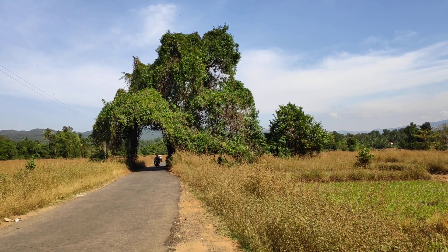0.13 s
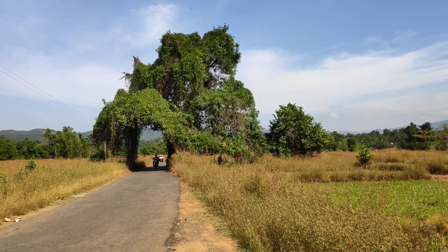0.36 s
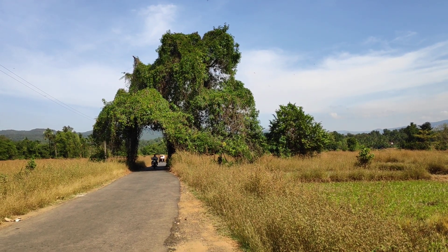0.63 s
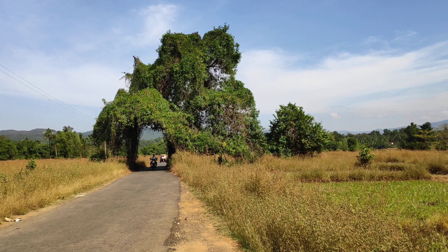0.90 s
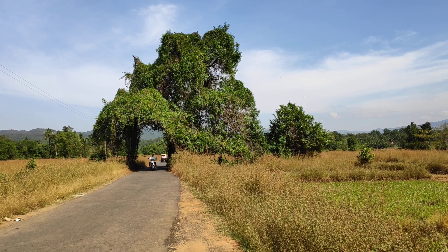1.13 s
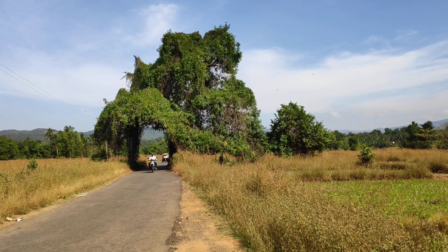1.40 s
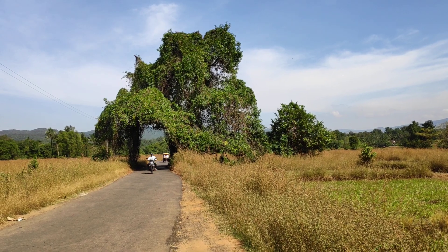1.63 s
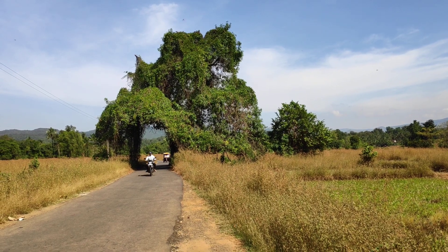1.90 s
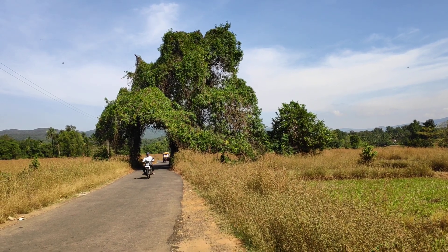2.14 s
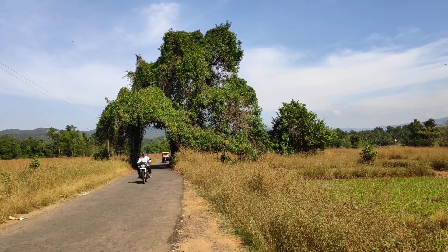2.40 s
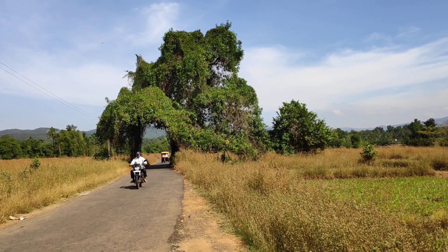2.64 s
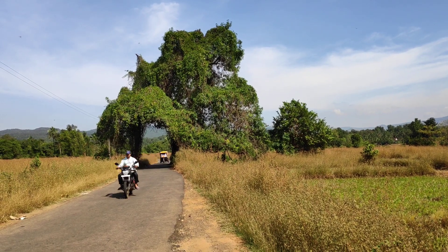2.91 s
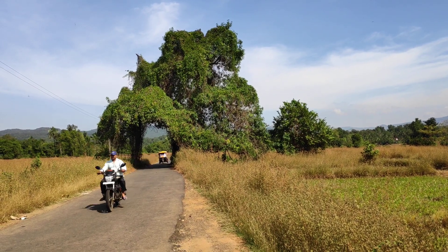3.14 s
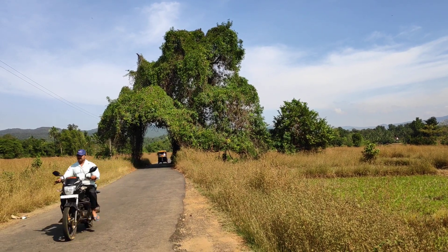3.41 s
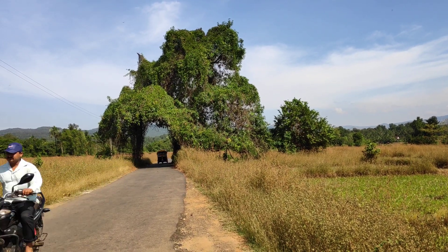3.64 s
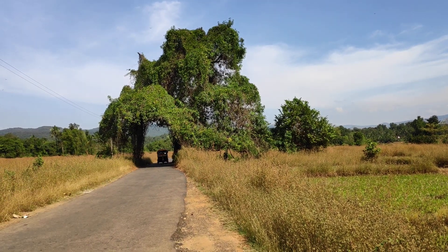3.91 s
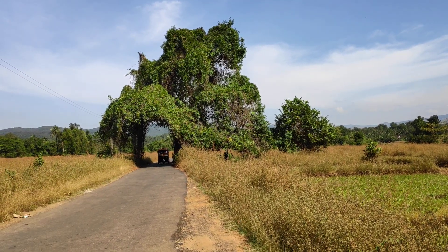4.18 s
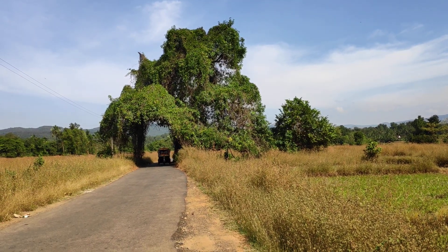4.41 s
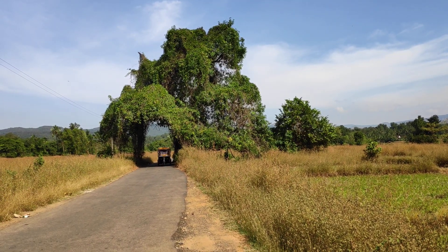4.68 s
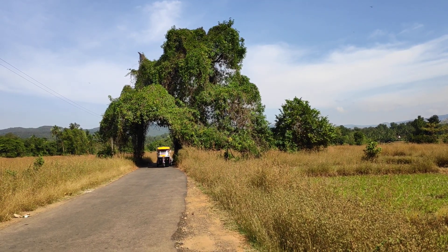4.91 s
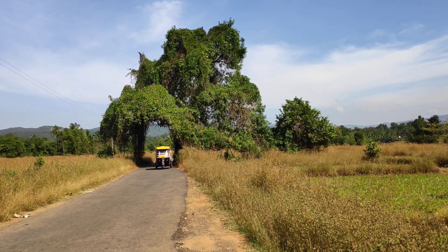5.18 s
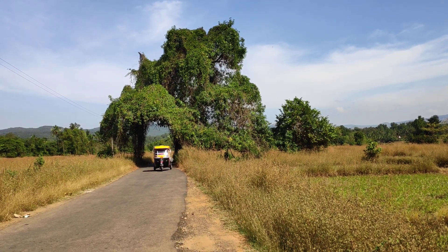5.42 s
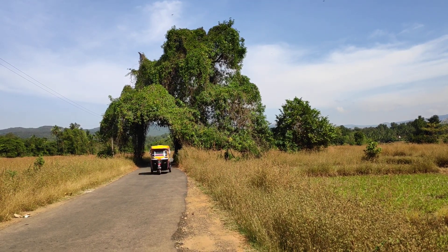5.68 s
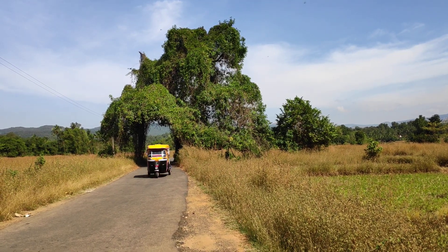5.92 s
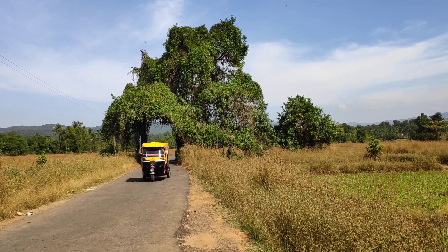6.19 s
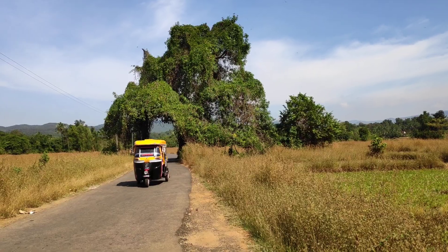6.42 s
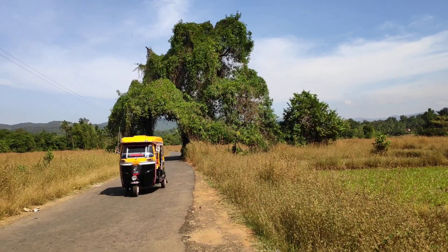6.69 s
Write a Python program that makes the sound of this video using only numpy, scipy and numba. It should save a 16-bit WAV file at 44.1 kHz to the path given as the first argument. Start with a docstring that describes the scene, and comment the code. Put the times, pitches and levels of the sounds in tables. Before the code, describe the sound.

Open country road, heard in stereo by a hand-held phone standing at the verge. From 0 s a single-cylinder motorcycle is distant and muffled by a tree, a quick low exhaust thump over faint rumble and field hiss. From about 1.5 s it grows steadily, thumps fusing into a rough drone with tyre roar, engine clatter and chain hiss. It peaks at about 4 s in a close, bright rush; the colour turns, pitch drops, and a sharp grit tick cracks at 4.3 s, another at 4.7 s. The motorcycle then recedes, thumping more dully. Around 5.6 s dry verge grass rustles briefly. Meanwhile a three-wheeler ahead emerges from about 4.5 s, its coarse putter and tyre roar growing, firing rate sagging slightly from 5.5 s. From 6.4 s dull body knocks cluster with fine grit ticks. Small low wind puffs come and go; it ends at 6.8 s with the three-wheeler still approaching.

```python
"""Exhaust thumps grow as a single-cylinder motorcycle comes down a country road, passes close by and recedes.
A three-wheeler follows it: both exhausts are chains of pulses, one a firing, with shaped noise for tyre roar and engine.
Dull knocks, dry grit ticks and a rustle of the verge join in, over low rumble, wind puffs and hiss from the fields.
Two microphone ports of a hand-held phone hear it all, and the colour turns as the motorcycle goes by."""
import sys
import numpy as np
from scipy import signal
from scipy.fft import rfft, irfft, next_fast_len
from scipy.io import wavfile
from scipy.ndimage import uniform_filter1d, map_coordinates
from numba import njit

SR = 44100
rng = np.random.default_rng(int(sys.argv[2]) if len(sys.argv) > 2 else 0)


def put_to_file(sound):
    """Save the sound as 16-bit audio at rate SR, in the file named by the first command-line argument."""
    columns = np.atleast_2d(sound).T  # one column per channel
    safe = np.clip(columns, -1, 1)
    whole_steps = np.round(safe * 32767)
    wavfile.write(sys.argv[1], SR, whole_steps.astype(np.int16))


def to_linear_factor(level_db):
    """Convert decibel levels (scalar or array-like) to linear amplitude factors."""
    exponent = np.asarray(level_db, float) / 20
    return 10 ** exponent


N = 300321
T = np.arange(N) / SR
SIZE = next_fast_len(N)
HZ = np.arange(SIZE // 2 + 1) * SR / SIZE + 1e-3  # just above 0, so that logarithms work

# Colour of sound from ahead at the two ports. Each row: frequency in Hz, left level in dB, right level in dB.
AHEAD_COLOUR = [(283, 12, 9), (468, -3, 2), (717, 11, 9), (860, 0.5, 3), (1300, 7.5, 4), (1970, -2, -3.5),
                (2780, -5, -3), (3500, -10.5, -8.5), (5130, -10, -10.5), (6500, -13.5, -12.5),
                (8500, -14, -15), (10000, -12, -28), (10700, -12.5, -20), (12000, -22, -42),
                (13800, -14.5, -51), (15700, -37, -46)]
# The three-wheeler as heard. Each row: time in seconds, firing rate in Hz, roar level in dB.
THREE_WHEELER = [(0, 40.3, -72), (4.4, 40.54, -53), (5.0, 40.6, -52.5), (5.5, 39.87, -46.5),
                 (5.8, 39.65, -47), (6.1, 39.06, -45), (6.4, 38.33, -44.5), (6.6, 37.72, -42.5),
                 (6.81, 37.1, -42)]

SPEED_M_S, PASSES_S, ASIDE_M = 13.6, 4.05, 2.66  # the motorcycle's straight path and how near it comes
ECHO_AHEAD = .6  # share of sound from ahead that returns off the holder's body, in the bass


def curves(table):
    """Columns of a time table, drawn as lines with one value a sample."""
    s, *columns = np.transpose(table)
    return [np.interp(T, s, c) for c in columns]


def unit(x):
    """Scale to rms 1."""
    return x / np.sqrt(np.mean(x ** 2))


def walk(rate):
    """Random levels held for 1 / rate seconds, then smoothed twice; spread near 1."""
    k = int(SR / rate)
    held = np.repeat(rng.standard_normal(N // k + 1), k)
    return 1.36 * uniform_filter1d(uniform_filter1d(held, k), k)[:N]


def across(table, column=1):
    """A spectrum table read at every FFT bin, evenly along a logarithmic frequency scale."""
    table = np.array(table, float)
    return np.interp(np.log(HZ), np.log(table[:, 0]), table[:, column])


def high_pass(hz, slope=6):
    """Smooth gain that lets the sound above hz through; slope times 6 dB an octave below."""
    return 1 / np.sqrt(1 + (hz / HZ) ** (2 * slope))


@njit
def band_pass(x, hz, width):
    """State-variable band-pass with a moving centre, gain 1."""
    y, band, low = np.empty(len(x)), 0., 0.
    for i in range(len(x)):
        g, k = np.tan(np.pi * hz[i] / SR), width / hz[i]
        v = (band + g * (x[i] - low)) / (1 + g * (g + k))
        band, low, y[i] = 2 * v - band, low + 2 * g * v, k * v
    return y


def lagged(left, right, lag_ms):
    """Sound reaches the left port a little later."""
    late = map_coordinates(left, [np.arange(N) - lag_ms * SR / 1000], order=3, mode="nearest")
    return np.array([late, right])


def port_spectra():
    """Noise spectra for both ports, most alike in the bass and less so in the treble."""
    # Each row: frequency in Hz, share of the power common to both ports from 0 to 1.
    likeness = [(300, .995), (1000, .97), (1700, .93), (2500, .75), (4000, .5), (7000, .62), (9000, .35),
                (15000, .25)]
    like = np.clip(across(likeness), 0, 1)
    common, left, right = rfft(rng.standard_normal((3, SIZE)))
    return [np.sqrt(like) * common + np.sqrt(1 - like) * own for own in (left, right)]


def coloured(spectra, colour, band, echo=0., echo_ms=(1.92, 2.04)):
    """Both ports through their colour, plus a delayed and duller return off the holder's body."""
    ports = []
    for i, spectrum in enumerate(spectra):
        returned = echo / (1 + (HZ / 4000) ** 4)  # the return fades above 4000 Hz
        delayed = np.exp(-2j * np.pi * HZ * echo_ms[i] / 1000)
        gain = to_linear_factor(across(colour, column=1 + i)) * (1 + returned * delayed)
        ports.append(irfft(spectrum * band * gain, SIZE)[:N])
    return unit(np.array(ports))


def thumps(cycles, order, db, scatter_db, shimmer_db, lift_db):
    """One pulse a firing, built from multiples of the firing rate; each firing has its own size."""
    # the phases follow from the levels, so that each pulse is struck and then rings
    log = np.zeros(33)
    log[:len(order) + 1] = np.log(to_linear_factor(np.r_[db[0], db]))
    log[len(order) + 1:] = np.log(to_linear_factor(db[-1] - 2.0))
    c = irfft(log)
    phase = rfft(np.r_[c[0], 2 * c[1:32], c[32], np.zeros(31)]).imag
    phase = phase + np.pi * 2 / 5  # the same turn for all multiples balances push and pull
    size = to_linear_factor(scatter_db * rng.standard_normal(N // 500))[(cycles + .1).astype(int)]
    wave = 0
    for k, d in zip(np.round(order), db):
        level = to_linear_factor(d + lift_db(k) + shimmer_db * walk(9))
        wave = wave + level * np.cos(2 * np.pi * k * cycles + phase[int(k)])
    return np.sqrt(2) * uniform_filter1d(size, size=60) * wave


def path(late_s=0., aside_m=ASIDE_M):
    """Distance (m) of the motorcycle and its angle from straight ahead (degrees)."""
    along = SPEED_M_S * (T - PASSES_S - late_s)
    return np.hypot(along, aside_m), np.degrees(np.arctan2(aside_m, -along))


def heard_db(db, loss_db, beam_db, aim, half_width, rear_db):
    """Level of one part of the motorcycle: distance, a change within a beam, front against back."""
    tree_m, tree_db_per_m = 45, 0.42  # beyond this distance the roadside tree muffles the motorcycle
    rear_deg, rear_width_deg = 165.1, 2.2  # from this far behind, rider and bodywork screen the engine
    r, angle = path()
    spread = -loss_db * np.log10(r)
    beam = beam_db * np.exp(-((angle - aim) / half_width) ** 4)
    tree = -tree_db_per_m * np.clip(r - tree_m, 0, None)
    rear = rear_db * (1 + np.tanh((angle - rear_deg) / rear_width_deg)) / 2
    return db + spread + beam + tree + rear


def exhaust(bearing):
    """Motorcycle exhaust thumps with Doppler shift and spreading, and the count of firings so far."""
    # Each row: time in seconds, firing rate at the source in Hz, level in dB at 1 m before the levels
    # of the multiples, lift of the four lowest multiples in dB.
    engine = [(0, 38.56, -26, 7), (.45, 38.45, -26, 2), (.7, 37.53, -23.5, 0), (1.5, 37.38, -18.5, -1.5),
              (1.9, 37.4, -18, -1.5), (2.7, 37.78, -18, -4), (3.0, 37.7, -17, -1), (3.45, 37.87, -21, 2.5),
              (3.6, 37.07, -21, 2.5), (3.8, 37.06, -22.5, 2.5), (3.98, 37.4, -24.5, 2.5),
              (4.1, 37.07, -28.5, 3), (4.25, 37.34, -23, 0), (4.4, 37.6, -22.5, 1.5),
              (4.55, 37.54, -21, 0.5), (5.1, 37.54, -19, 2), (5.8, 37.7, -19.5, 0.5),
              (6.3, 37.77, -22, -10), (6.81, 37.42, -24.5, 1)]
    # Each row: multiple of the firing rate, level in dB from the front, level in dB from behind.
    multiples = [(1, -9.5, -9), (2, -4, -8), (3, -11, -13), (4, -20.5, -8.5), (5, 0.5, 1), (6, -6.5, -2),
                 (7, -15.5, -10), (8, -20, -15.5), (9, -14, -14), (10, -18, -15), (11, -31, -22),
                 (12, -30, -25), (13, -18.5, -25), (14, -25, -22)]
    hz, db, low_db = curves(engine)
    r, angle = path(.03, 1.6)  # the tail pipe passes later (s) and nearer (m)
    hz = hz / (1 - SPEED_M_S / 343 * np.cos(np.radians(angle)))  # Doppler shift
    db = db - 20 * np.log10(r)
    wheel_hz, wheel_wobble = 5.6, .006  # the load, and so the firing rate, sways once a wheel turn
    sway = wheel_wobble * (1 + .4 * walk(2)) * np.sin(2 * np.pi * wheel_hz * T)
    cycles = np.cumsum(hz * (1 + .003 * walk(12) + sway)) / SR
    order, front_db, rear_db = np.transpose(multiples)
    lift = lambda k: low_db * (k < 4.5)
    front = thumps(cycles, order, front_db, 1.3, 1.5, lift)
    back = thumps(cycles, order, rear_db, 1.3, 1.5, lift)
    rear = np.clip(bearing / 2, 0, 1)
    return to_linear_factor(db) * ((1 - rear) * front + rear * back), cycles


def tyre_and_engine_noise(bearing, cycles):
    """Four bands of noise that swell once a firing and blend the colours ahead, abreast and behind."""
    # Rows: tyre roar, engine clatter, chain and valve hiss, finest sizzle. Each row: level in dB at 1 m,
    # loss in dB for tenfold distance, lift within the side beam in dB, its aim and its half width in degrees
    # from straight ahead, change from behind in dB.
    parts = [(-27, 16.85, 6.3, 82, 44, -0.5), (-27.5, 20.8, 8.4, 83, 55, -5.5),
             (-17.5, 30.4, 1.9, 86, 53.3, -4.5), (-28, 27.6, 8.6, 110, 28, -4)]
    # Colours by direction. Each row: frequency in Hz, left level in dB, right level in dB.
    abreast_colour = [(325, 1, 1), (523, -5.5, -5.5), (716, 4, 5.5), (1030, 6.5, 4), (1510, 0, 4),
                      (1990, -3.5, -10.5), (2720, 1.5, -4.5), (3800, -6, -10), (5500, -1.5, -7),
                      (6600, -6, -1), (7700, -3.5, -2.5), (8900, -3, -7), (10600, -4, -8), (12000, 0.5, -9),
                      (14200, 3, -12), (16400, -2, -38)]
    behind_colour = [(314, -9.5, 5.5), (500, -3, -19), (725, -2.5, -0.5), (1090, -4.5, -7),
                     (1630, -6.5, -13.5), (2470, 4, -5), (2830, 3, -6), (4000, -11, -12), (5200, -8, -2.5),
                     (6460, -14, -4.5), (8150, -23, -3), (9150, -2.5, -5), (10500, -16, -14.5),
                     (12000, -18, -14), (13800, -8, -21), (15500, -14.5, -21)]
    low, high, top = high_pass(1860), high_pass(4590), high_pass(10280)
    roar = high_pass(264, slope=2.8) * np.sqrt(1 - low ** 2)
    bands = roar, low * np.sqrt(1 - high ** 2), high * np.sqrt(1 - top ** 2), top
    levels_db = [heard_db(*row) for row in parts]
    depths, flickers_db = (.06, .1, .12, .12), (.8, 1., 1.2, 1.4)
    beat = np.cos(2 * np.pi * cycles - 1.0)
    gusty = 0.93 * walk(9)  # air eddies sway all bands together
    out = np.zeros((2, N))
    directions = (AHEAD_COLOUR, ECHO_AHEAD), (abreast_colour, .1), (behind_colour, .15)
    for k, (colour, echo) in enumerate(directions):
        share = np.sqrt(np.clip(1 - abs(bearing - k), 0, 1))
        spectra = port_spectra()
        for band, level_db, depth, flicker_db in zip(bands, levels_db, depths, flickers_db):
            level = to_linear_factor(level_db + flicker_db * (walk(21.88) + gusty)) * (1 + depth * beat)
            out = out + share * level * coloured(spectra, colour, band, echo=echo)
    return out


def phone_shadow(out, bearing):
    """The phone's body takes moving dips out of the left port; its edge hollows the low mids of both."""
    # Each row: bearing (0 ahead, 1 abreast, 2 behind), low dip in Hz, high dip in Hz, depth from 0 to 1
    # before a limit of .68.
    dips = [(.1, 4400, 9000, .5), (.3, 4500, 9600, 0.97), (.6, 6500, 11490, .68), (1, 6600, 11000, 0.34),
            (1.4, 5840, 12000, .68), (1.95, 6600, 11580, 0.2)]
    at, *columns = np.transpose(dips)
    low_hz, high_hz, depth = (np.interp(bearing, at, c) for c in columns)
    for dip_hz, width_hz in ((low_hz, 1900.), (high_hz, 2000.)):
        out[0] -= np.clip(depth, 0, .68) * band_pass(out[0], dip_hz, width_hz)
    # the hollow starts before the motorcycle is abreast and is full soon after
    for port, edge_hz in enumerate((1400., 1720.)):
        hollow = .55 * np.clip(bearing - .4, 0, 1)
        out[port] -= hollow * band_pass(out[port], np.full(N, edge_hz), 500.)
    return out


def motorcycle():
    """Exhaust thumps over roar, clatter and hiss; their colour and port lag turn with the bearing."""
    side = ASIDE_M / path()[0]  # 1 when abreast, near 0 when far
    turn_ahead, turn_behind = 0.65, 1.1  # how fast the colour turns away from the side colour
    bearing = np.where(T < PASSES_S, side ** turn_ahead, 2 - side ** turn_behind)  # 0 ahead 1 abreast 2 behind
    lag_far_ms, lag_abreast_ms = 0.048, 0.374
    lag_ms = lag_far_ms + (lag_abreast_ms - lag_far_ms) * side ** 0.88
    pipe, cycles = exhaust(bearing)
    out = pipe + tyre_and_engine_noise(bearing, cycles)
    return lagged(*phone_shadow(out, bearing), lag_ms)


def three_wheeler():
    """A second chain of exhaust thumps with a hum of upper multiples, and its roar from ahead."""
    # Each row: multiple of the firing rate, level in dB.
    multiples = [(1, -12), (2, -2.5), (3, -6.5), (4, -11), (5, -16), (6, -3.5), (7, -15), (8, -12.5),
                 (9, -19), (10, -10), (11, -20), (12, -8.5)]
    # Each row: frequency in Hz, left level in dB, right level in dB.
    colour = [(302, 0, 2), (442, -12, -7.5), (700, 4, 5), (910, -2, 0), (1310, 4, -1), (2120, -9, -5),
              (3020, -7, -8.5), (3900, -17, -10), (5200, -12, -13.5), (6500, -22, -17), (8050, -16.5, -21),
              (9200, -25, -43), (10500, -26, -53), (12000, -24, -49), (13800, -24, -49), (15500, -28, -37)]
    hz, roar_db = curves(THREE_WHEELER)
    pipe_db = roar_db - 4.5
    # the upper hum is lifted at speed and fades below a firing rate of 39.46 Hz, by 10 dB a Hz
    hum_db = 4.5 + 10 * np.clip(hz - 39.46, None, 0)
    cycles = np.cumsum(hz * (1 + .003 * walk(20))) / SR
    pipe = thumps(cycles, *np.transpose(multiples), 1.2, 2.3, lambda k: hum_db * (k > 10.5))
    roar = coloured(port_spectra(), colour, high_pass(280, slope=5.9), echo=ECHO_AHEAD)
    roar = roar * to_linear_factor(roar_db + 0.94 * walk(10)) * (1 + .1 * np.cos(2 * np.pi * cycles))
    return lagged(*(to_linear_factor(pipe_db) * pipe + roar), 0.1)


def jolts():
    """The three-wheeler knocks over a rough patch: short pushes that ring the body briefly."""
    # Each row: start in seconds, rough peak level in dB, ring in Hz.
    knocks = [(6.402, -34, 89.4), (6.534, -29.5, 100), (6.566, -32, 130), (6.597, -29.5, 140.4),
              (6.629, -31, 150), (6.656, -30, 79.4), (6.715, -30.5, 138.8), (6.769, -31, 148),
              (6.796, -32, 150)]
    out, t = np.zeros(N + 4000), np.arange(4000) / SR
    swell = t / 0.0047 * np.exp(1 - t / 0.0044)
    for s, db, hz in knocks:
        i = int(s * SR)
        out[i:i + 4000] += to_linear_factor(db) * np.sin(2 * np.pi * hz * t + 0.83) * swell
    return out[:N]


def rustle():
    """Verge grass and dust stirred by the motorcycle's wake: noise that swells once and dies."""
    # Each row: frequency in Hz, left level in dB, right level in dB.
    colour = [(5002, -22, -13), (7500, 0, 1), (9000, 4, -2), (10500, -4, -8), (12000, -9, -16),
              (13700, 3, -22), (15550, -13, -15.5)]
    peak_s, rise_s, fall_s = 5.614, 0.24, 0.23  # the peak, and the times to 9 dB down
    swell = np.exp(-((T - peak_s) / np.where(T < peak_s, rise_s, fall_s)) ** 2)
    return swell * to_linear_factor(-54.5 + 2.0 * walk(24.93)) * coloured(port_spectra(), colour, 1.)


def ticks():
    """Grit thrown by tyres: short bright cracks of noise that die in a few milliseconds."""
    # Each row: start in seconds, peak level in dB midway between the ports, left minus right in dB,
    # centre in Hz.
    grit = [(.142, -47, 5, 8500), (2.477, -44, 0, 11000), (3.5, -43, 2, 12000), (4.33, -28, 4, 12500),
            (4.689, -34, -4, 9000), (5.434, -48, 6, 13500), (5.601, -39, 6, 11500), (5.622, -36, 8, 10800),
            (6.381, -40, 3, 11500), (6.501, -43, 2, 12000), (6.52, -38.5, 7, 11500), (6.524, -44, 1, 12000)]
    out, n = np.zeros((2, N)), np.arange(800)
    fade = np.exp(-n / (.0007 * SR)) + .25 * np.exp(-n / (.004 * SR))
    for (s, db, pan_db, hz), noise in zip(grit, rng.standard_normal((len(grit), 800))):
        crack = band_pass(noise * fade, np.full(800, 1. * hz), 7000.)
        i = int(s * SR)
        port_db = db + np.array([[pan_db], [-pan_db]]) / 2
        out[:, i:i + 800] += crack / abs(crack).max() * to_linear_factor(port_db)
    return out


def rumble():
    """Low noise of road and bodywork with a boom that carries far, the same at both ports."""
    # Rows: the motorcycle's rumble, its boom. Each row: level in dB at 1 m, loss in dB for tenfold distance,
    # change within a beam in dB (below 0 is a cut), the beam's aim and half width in degrees from ahead,
    # change from behind in dB.
    low_parts = [(-35.5, 12.9, -11, 88, 56, 0), (-55, 0.93, 15, 23, 12, 0)]
    # Spectra of the two. Each row: frequency in Hz, level in dB.
    broad_colour = [(20, 1), (40, 12.5), (80, -0.5), (120, 3.5), (170, 7), (250, -4), (400, -6), (600, -48)]
    boom_colour = [(90, -34), (125, -4), (150, 9.5), (175, -3.5), (230, -34.5)]
    broad, boom = (to_linear_factor(heard_db(*row)) for row in low_parts)
    broad = np.hypot(broad, to_linear_factor(curves(THREE_WHEELER)[1] - 6.5))  # the three-wheeler's, 6.5 dB under its roar
    out = np.zeros(N)
    for gain, colour in ((broad, broad_colour), (boom, boom_colour)):
        spectrum = rfft(rng.standard_normal(SIZE)) * to_linear_factor(across(colour)) * high_pass(12)
        out += gain * to_linear_factor(walk(5.6)) * unit(irfft(spectrum, SIZE)[:N])
    return out


def wind():
    """A faint breeze and short puffs of low noise, unrelated at the two ports."""
    # Each row: middle in seconds, length in seconds, level in dB, frequency in Hz above which it fades.
    puffs = [(0.425, 0.18, -55, 71), (3.063, 0.042, -50, 120), (3.552, 0.049, -45, 70),
             (3.803, 0.064, -43, 70), (3.913, .05, -41, 70), (4.159, .12, -51, 70), (5.25, 0.078, -43, 119),
             (5.46, 0.068, -44.5, 120), (6.68, 0.22, -45, 70)]
    white = rfft(rng.standard_normal((2, SIZE))) * high_pass(27, slope=1.6)
    soft = lambda hz: unit(irfft(white / (1 + (HZ / hz) ** 4.6), SIZE)[:, :N])
    out = to_linear_factor(-66 + 1.7 * walk(6.2)) * soft(66.0)
    for s, length, db, hz in puffs:
        a, b = max(int((s - 2 * length) * SR), 0), int((s + 2 * length) * SR)
        swell = np.exp(-(2 * (T[a:b] - s) / length) ** 2)
        out[:, a:b] += to_linear_factor(db) * swell * soft(hz)[:, a:b]
    return out


def fields():
    """A faint, nearly even hiss of grass and leaves ahead, mostly above 4200 Hz."""
    return to_linear_factor(-64.5 + 0.56 * walk(3.2)) * coloured(port_spectra(), AHEAD_COLOUR, high_pass(4200, slope=2.5))


def scene():
    """Both vehicles, small sounds, rumble, wind and hiss at the two ports."""
    return motorcycle() + three_wheeler() + jolts() + rustle() + ticks() + rumble() + wind() + fields()


def band_limit(x):
    """A steep low-pass at the top of the band."""
    return signal.sosfilt(signal.butter(12, 15950, fs=SR, output="sos"), x)


def record(dry):
    """A steep low-pass removes the sound above 15850 Hz."""
    low_pass = signal.ellip(8, .2, 70, 15850, fs=SR, output="sos")
    mix = signal.sosfilt(low_pass, dry)
    return band_limit(mix)


dry = scene()
out = record(dry)
put_to_file(out)
```